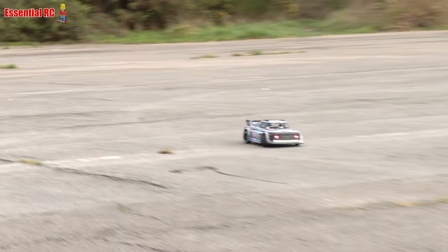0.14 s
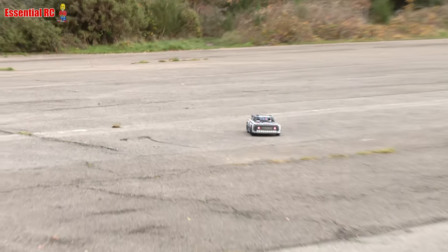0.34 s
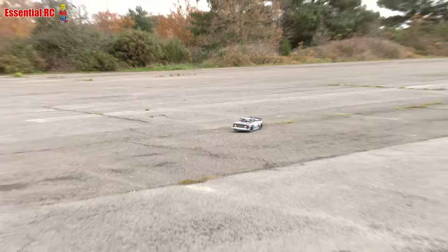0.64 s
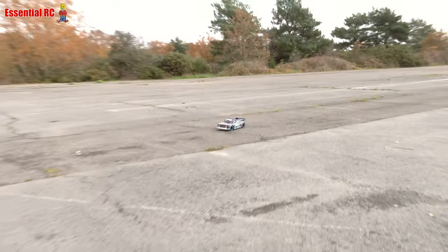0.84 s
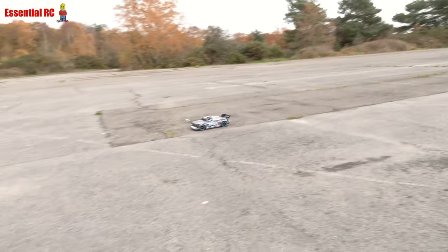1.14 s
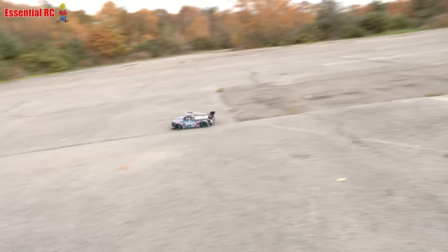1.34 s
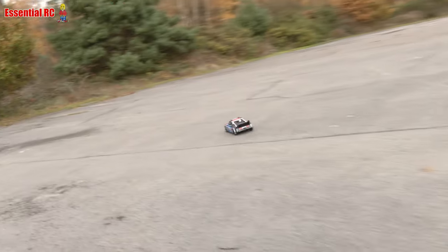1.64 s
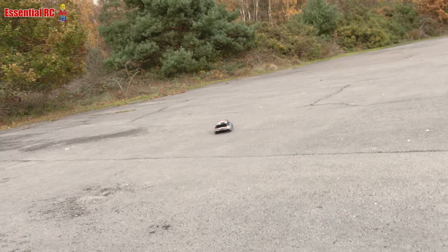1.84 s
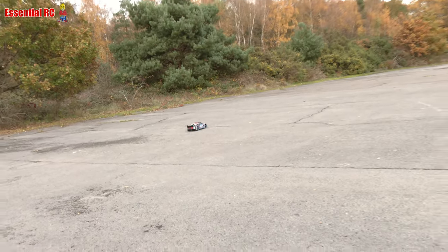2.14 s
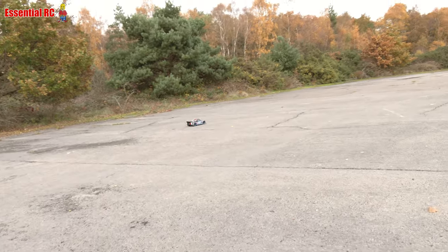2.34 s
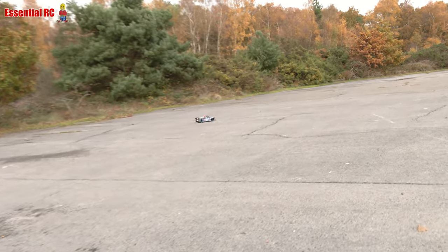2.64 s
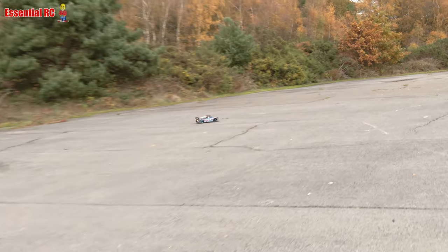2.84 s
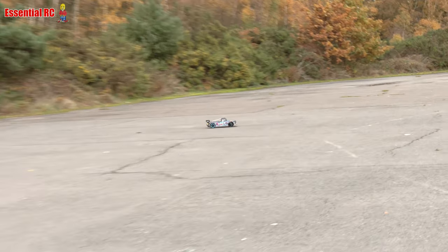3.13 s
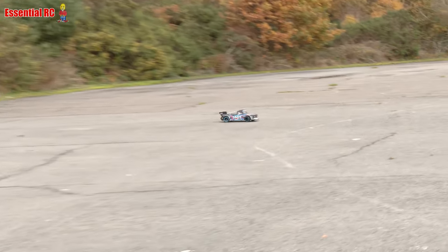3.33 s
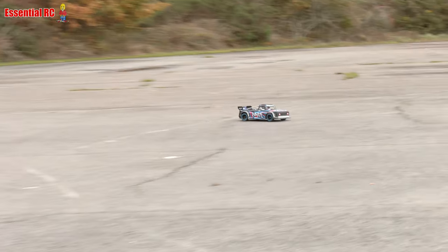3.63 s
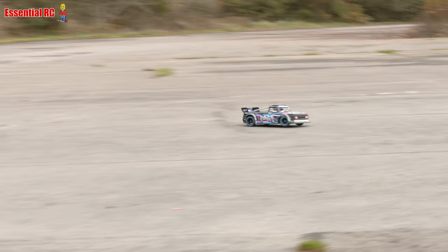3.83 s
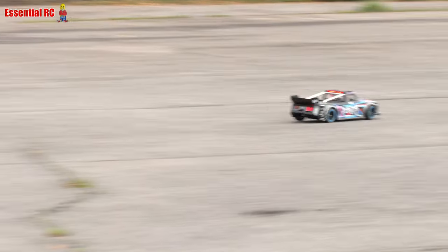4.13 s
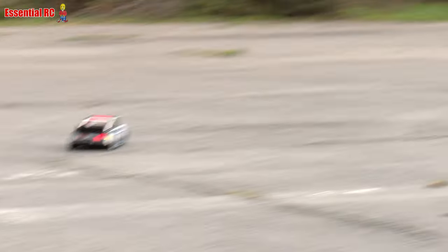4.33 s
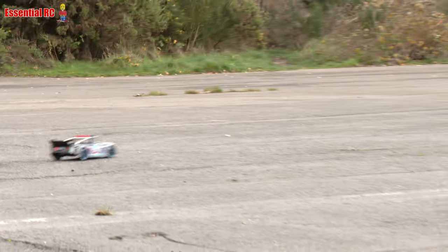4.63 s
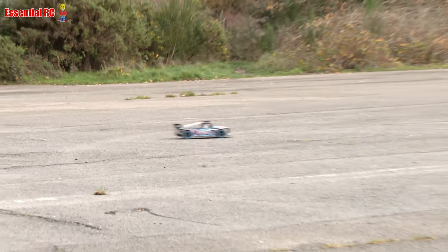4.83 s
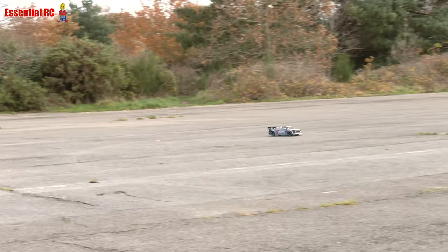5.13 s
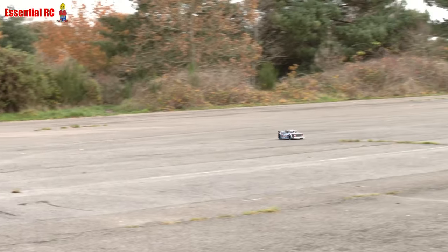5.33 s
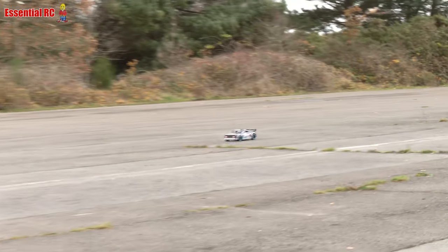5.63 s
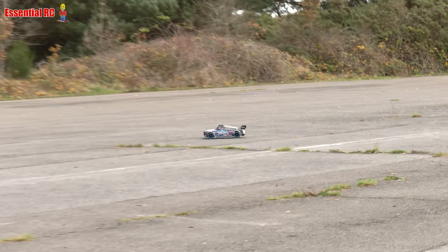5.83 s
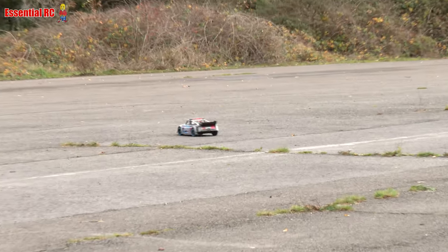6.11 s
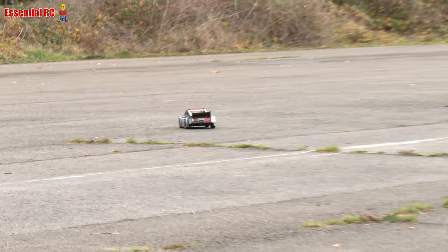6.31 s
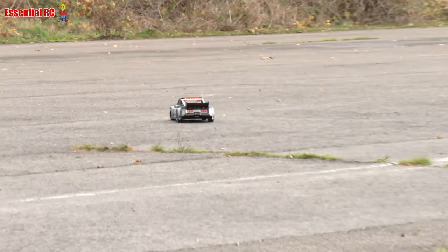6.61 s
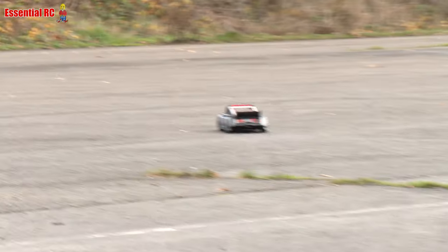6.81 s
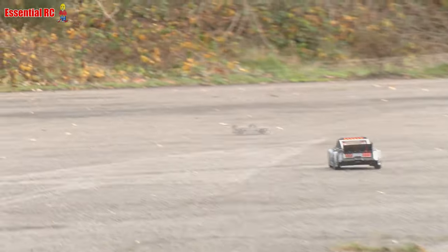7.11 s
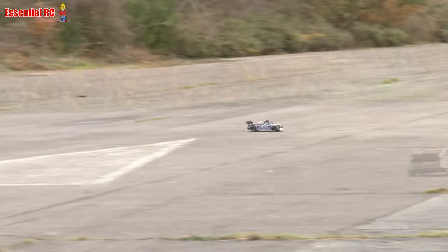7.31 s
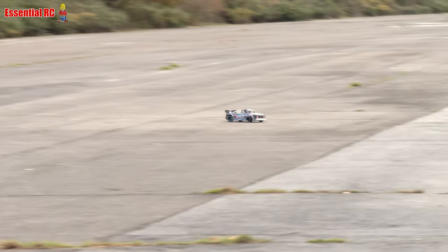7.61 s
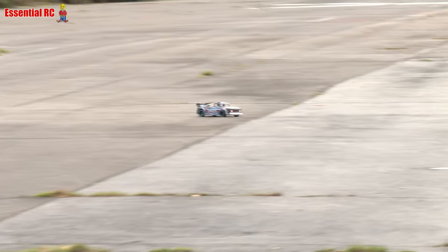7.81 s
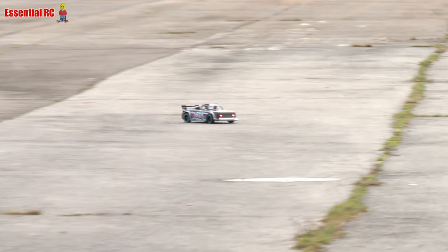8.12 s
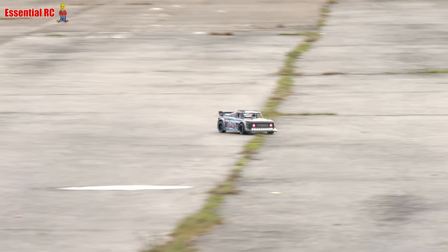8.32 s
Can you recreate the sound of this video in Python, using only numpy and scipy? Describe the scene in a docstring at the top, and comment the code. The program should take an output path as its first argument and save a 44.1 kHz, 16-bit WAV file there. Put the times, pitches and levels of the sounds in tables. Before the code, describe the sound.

Outdoors on open asphalt, a small electric truck gives a gritty, high gear whine with scraping rasp. Its pitch plunges in turns and climbs again under throttle. Tyres rumble on a hollow plastic shell, with rattles, sharp clicks and tiny squeals. It is loudest early on, drops sharply near the middle, and ends quieter and farther away. Close stereo microphone, light wind puffs, faint hush and very little echo.

```python
"""Radio-controlled truck on asphalt

A small electric truck laps an open car park close to two microphone ports.
Meshing gear teeth give harmonics and scraping noise; tyres are random impacts on a resonant plastic shell.
Short broadband clicks, each with a dull ring, and brief squeals stand out above them.
Low noise is wind at the ports, steady wider noise is distant outdoor hush, and a decaying scatter is the faint echo."""
import sys
import numpy as np
from scipy import signal
from scipy.fft import rfft, irfft, next_fast_len
from scipy.io import wavfile

SR = 44100
rng = np.random.default_rng(int(sys.argv[2]) if len(sys.argv) > 2 else 0)


def bounce(signal):
    """Save signal as a 16-bit WAV file at the path given by the first command-line argument."""
    frames = np.transpose(np.atleast_2d(signal))
    limited = np.clip(frames, -1, 1)
    pcm = np.round(limited * 32767).astype(np.int16)
    wavfile.write(sys.argv[1], SR, pcm)


N = 373086
TIME = np.arange(N) / SR  # s
SIZE = next_fast_len(N + SR // 2)  # transform length, with room for the echo
HZ = np.maximum(np.arange(SIZE // 2 + 1) * SR / SIZE, 1)

# motor speed, as the rate at which gear teeth mesh: [t/s, f/Hz]
MESH_RATE = [(0, 2240), (.1, 2183), (.135, 1755), (.2, 1364), (.3, 1033), (.41, 1464), (.51, 1925),
             (.63, 2025), (.72, 2150), (.78, 2468), (.83, 2245), (.96, 2345), (1.08, 2320), (1.16, 2220),
             (1.23, 2310), (1.42, 2283), (1.48, 2212), (1.52, 2362), (1.555, 2165), (1.62, 2373),
             (1.76, 2177), (1.8, 1830), (1.85, 1640), (1.96, 1450), (2.08, 1002), (2.22, 1261), (2.3, 1676),
             (2.54, 1990), (2.65, 2254), (2.72, 2183), (2.82, 2208), (2.87, 1770), (2.96, 1751),
             (3.05, 1834), (3.11, 1778), (3.22, 2129), (3.33, 2141), (3.45, 2297), (3.56, 2150),
             (3.66, 2255), (3.88, 2254), (3.93, 2132), (4, 2250), (4.035, 1995), (4.16, 2050), (4.25, 2278),
             (4.31, 2160), (4.39, 2330), (4.48, 2257), (4.53, 2317), (4.59, 2046), (4.64, 2139),
             (4.67, 1780), (4.71, 1473), (4.84, 1548), (4.92, 1772), (5.05, 1960), (5.13, 1906),
             (5.21, 2153), (5.4, 2223), (5.54, 2227), (5.6, 2043), (5.73, 880), (5.8, 1108), (5.87, 1480),
             (5.96, 1517), (6.02, 1390), (6.07, 1602), (6.19, 1638), (6.255, 1755), (6.32, 1236),
             (6.38, 1023), (6.42, 1275), (6.465, 1263), (6.515, 1620), (6.56, 1523), (6.61, 1048),
             (6.68, 992), (6.76, 1469), (6.85, 1655), (6.96, 1627), (7.03, 1795), (7.065, 2060),
             (7.135, 1752), (7.21, 1937), (7.27, 1900), (7.42, 1606), (7.7, 1504), (7.99, 1492),
             (8.1, 1696), (8.15, 1924), (8.19, 1870), (8.24, 1984), (8.285, 1900), (8.35, 2255),
             (8.46, 2410)]
# spans in which the gears run slack; a row that ends before it starts has no effect: [start t/s, end t/s]
SLACK_SPANS = [(.115, 0.39), (1.797, 2.25), (2.82, 2.74), (4.03, 4.37), (4.69, 4.74), (5.63, 6),
               (5.97, 6.14), (6.26, 6.41), (6.565, 6.87), (7.06, 7.06), (7.24, 7.5)]
# how strongly the gears sing over their rasp: [t/s, relative level/dB]
SINGING = [(0, -4), (.25, -10), (.42, -5), (.55, -1.5), (.8, -4), (1.1, -2), (1.4, -1.5), (1.75, -7),
           (2.25, -12), (2.42, -6), (2.7, -3.5), (2.9, -6), (3.1, -6), (3.45, -3), (3.6, -5), (3.9, -3.5),
           (4.6, -6), (4.85, -8), (5.15, -6.5), (5.55, -1.5), (5.75, -6), (5.9, -4), (6.3, -2), (6.55, -1),
           (6.9, -1.5), (7.25, -2), (7.5, -8), (7.95, -11), (8.2, -2), (8.46, -3)]
# harmonics of the gear whine: [multiple of the mesh rate, relative level/dB]
WHINE_HARMONICS = [(1, -0.5), (2, -2.5), (3, -3), (4, -2.5), (5, -1.5), (6, -2)]
# how well the gearbox radiates its whine: [f/Hz, gain/dB]
GEARBOX_GAIN = [(700, 22), (1300, -2.5), (1850, 3.5), (2300, -3), (2650, 9), (3100, 7), (3900, 6),
                (4600, 3.5), (5600, -0.5), (6400, -3.5), (7600, 5), (8500, -0.5), (9200, -10), (10200, -30),
                (15000, -31)]
# spectrum of scraping teeth, also of the clicks: [f/Hz, relative density/dB]
RASP_SPECTRUM = [(100, -32), (1500, -10.5), (2600, -0.5), (3300, -1.5), (4500, -0.5), (5500, -1), (7300, 2),
                 (8900, -5), (10000, -17.5), (13000, -23.5), (15500, -38)]
# spectrum of slack teeth clattering: [f/Hz, relative density/dB]
CLATTER_SPECTRUM = [(800, -25), (2000, -15), (2600, -5), (3800, 14), (5000, -6), (7000, -20), (12000, -42)]
# gears as the truck nears, turns and leaves, and falling almost silent briefly near 7.4 s, before speed and
# load: [t/s, level/dB]
GEAR_LEVEL = [(0, -30), (.3, -31), (.55, -28), (.66, -29.5), (.8, -26), (1.15, -25), (1.35, -23),
              (1.5, -24.5), (1.77, -24), (1.9, -27.5), (2.1, -27.5), (2.35, -27), (3, -32.5), (3.35, -29),
              (3.6, -29.5), (4.15, -28.5), (4.45, -27.5), (4.68, -29.5), (4.72, -45), (4.79, -35),
              (4.95, -32.5), (5.55, -33), (6.2, -32), (6.5, -36.5), (6.8, -34), (7.1, -35.5), (7.4, -50.5),
              (7.7, -46), (8, -44.5), (8.46, -41.5)]
# depth of the throb of the big gear, either side of its mean: [t/s, depth/dB]
THROB_DEPTH = [(0, 2), (1.3, 1.5), (1.7, 3), (1.9, 4.5), (2.1, 2.5), (2.6, 1.5), (7, 1.5), (7.4, 2.5),
               (8.46, 1.5)]
# spectrum of the chassis rattle: [f/Hz, relative density/dB]
RATTLE_SPECTRUM = [(100, -34), (600, -25), (1100, 3.5), (1400, 2.5), (1800, 6), (2200, -2), (2900, -21),
                   (5000, -36)]
# chassis rattle, before the bumps: [t/s, level/dB]
RATTLE_LEVEL = [(0, -35), (.26, -38), (.54, -31), (.85, -32), (1.75, -27), (2.05, -36), (2.4, -35),
                (3.3, -37.5), (3.72, -39), (4.5, -31.5), (4.8, -44.5), (4.97, -39.5), (5.4, -39),
                (5.95, -46), (6.24, -39.5), (6.65, -43.5), (7.05, -41), (7.55, -52.5), (8.46, -48.5)]
# spectrum of the tyres before the shell resonates: [f/Hz, relative density/dB]
TYRE_SPECTRUM = [(30, -56), (100, -23), (280, -8.5), (400, -5.5), (520, -3), (750, -1), (1100, -11),
                 (1600, -12), (4000, -40)]
# plastic shell resonances, added to the direct sound: [f/Hz, width/Hz, level/dB]
SHELL_MODES = [(599, 140, 7), (666, 46, -6.5)]
# rolling wheels, before their random drift: [t/s, level/dB]
ROLLING_LEVEL = [(0, -37.5), (.35, -38.5), (1, -31), (1.45, -29), (1.8, -32.5), (2.1, -37), (2.6, -38),
                 (3.75, -39), (4.4, -35), (4.8, -39.5), (5.6, -43), (6.05, -50.5), (7, -43), (7.4, -47),
                 (7.851, -50), (8.46, -43)]
# sideways slides through the turns: [t/s, length/s, level/dB]
SLIDES = [(1.4, 0.56, -32.5), (2.85, 0.99, -36.5), (3.95, 0.84, -44), (5.2, 0.27, -45), (5.95, 0.56, -45.5)]
# top treble of the truck: [t/s, gain/dB]
TREBLE_GAIN = [(0, 0.5), (1.2, 6), (2, 0), (3.8, 3.5), (4.3, -1), (5.7, -1.5), (6.8, -1), (7.5, -5),
               (8.46, 3)]
# balance of the microphone ports: [f/Hz, left minus right level/dB]
PORT_BALANCE = [(150, -4.5), (380, 3), (700, 6), (1400, 6.5), (2300, 8), (3100, 2.5), (4500, 2.5),
                (6000, -5.5), (8000, -4), (10000, 1)]
# phase between the ports: [f/Hz, lead of the left/rad]
PORT_PHASE = [(0, 0), (260, -2.2), (1400, -2.6), (3000, -3.25), (5300, -4.2), (8000, -4.6), (9800, -6),
              (15000, -9.4)]
# spectrum of the outdoor hush: [f/Hz, relative density/dB]
HUSH_SPECTRUM = [(40, -25), (120, -1.5), (300, -6.5), (450, -9), (610, 0), (800, -5), (1200, -10.5),
                 (2500, -16), (7000, -25), (10000, -29), (15000, -32)]
# spectrum of the wind on the ports: [f/Hz, relative density/dB]
WIND_SPECTRUM = [(20, -27), (50, -2), (90, 0), (150, -2), (250, -6.5), (500, -23.5), (1500, -57)]
# gusts and puffs, before lumps and port balance: [t/s, length/s, level/dB]
GUSTS = [(.08, 0.33, -41), (.6, 0.4, -48.5), (1.75, 0.16, -57), (3.75, 0.41, -64), (4.5, 0.46, -45.5),
         (5.823, 0.056, -45), (2.6, 0.97, -61), (5.2, 0.24, -58), (6.1, 0.5, -53.5), (6.207, 0.023, -49),
         (6.97, 0.19, -52)]
# short broadband clicks, each with a dull ring, before the gains of both: [t/s, level/dB]
CLICKS = [(0.017, -25.5), (0.157, -48), (0.299, -33), (0.681, -34), (1.382, -24), (2.149, -33),
          (2.751, -34), (4.727, -25), (4.975, -24)]
# short squeals as the gear whine passes a body resonance: [t/s, length/s, f/Hz, level/dB]
SQUEALS = [(2.153, 0.052, 685, -34), (2.787, 0.092, 931, -29.5), (4.735, 0.016, 1494, -34),
           (5.811, 0.029, 1141, -37), (6.381, 0.023, 968, -27.5), (6.657, 0.043, 1004, -36),
           (7.019, 0.086, 1757, -34), (7.138, 0.098, 1760, -33.5)]
# growls of the drive train pulling out of a turn: [t/s, length/s, level/dB]
GROWLS = [(2.3, .4, -45), (3.1, .7, -43.5), (4.97, .22, -42), (7.15, .5, -46)]
# the hardest puff, before port balance: [t/s, length/s, f/Hz, peak level/dB]
THUMPS = [(4.727, .015, 125, -29)]

TEETH = 31  # tooth contacts per turn of the big gear
PINION_TEETH = 9.5  # tooth contacts per cycle of the pinion's wobble
TORQUE_LAG_S = 0.0033  # time constant with which the gears take up load and go slack
FULL_HZ = 2200  # mesh rate at which the gear levels hold
GEAR_DB_PER_OCTAVE, SLACK_DROP_DB = 5.5, 2.5  # rise with speed, drop when slack
RASP_DB, WHINE_DB, CLATTER_DB = -0.32, -3.3, -10  # relative levels within the gears
SLACK_WHINE_DROP_DB = 4  # further loss of whine when the teeth run slack
TOOTH_REPEAT = 0.11  # share of a tooth's scrape that the next repeats, at FULL_HZ and full load
SCRUB_DB = -10.5  # tread hum on the straight, against the rolling level
CALM_DB = -61  # breeze between gusts, before lumps and port balance
WIND_LEFT_DB = -17.0  # wind on the left port, against the right
TREBLE_FROM_HZ, CUTOFF_HZ = 9500, 15600


def from_db(db):
    """Decibel law: amplitude gain from a level."""
    return 10 ** (np.asarray(db) / 20)


def rms_one(x):
    """Normalisation: scale to unit root-mean-square amplitude."""
    return x / np.sqrt(np.mean(x ** 2) + 1e-20)


def curve(rows):
    """Linear interpolation: a (time, value) table at every sample."""
    times, values = np.transpose(rows)
    return np.interp(TIME, times, values)


def response(points):
    """Frequency response: gain from (Hz, dB) points, interpolated over log frequency."""
    hz, db = np.transpose(points)
    return from_db(np.interp(np.log(HZ), np.log(hz), db))


def filtered(x, gain):
    """Linear filtering: multiply the spectrum by a frequency response."""
    return irfft(rfft(x, SIZE) * gain, SIZE)[..., :N]


def shaped_noise(gain, channels=()):
    """Spectral shaping: white noise through a frequency response."""
    return filtered(rng.standard_normal((*channels, N)), gain)


def drift(rate):
    """Low-passed random process: smooth motion of unit rms, changing about rate times a second."""
    r = np.exp(-20 * np.pi * rate / SR)  # computed at a tenth of the sample rate
    noise = rng.standard_normal(N // 10 + 4002)
    slow = signal.lfilter([1], [1, -2 * r, r * r], noise)[4000:]  # start-up dropped
    return np.interp(np.arange(N) / 10, np.arange(len(slow)), rms_one(slow))


def grains(per_s, spread_db):
    """Random impulse train: tiny impacts of uneven size."""
    sizes = from_db(spread_db * np.minimum(rng.exponential(1, N), 5))
    struck = rng.random(N) < per_s / SR
    return rms_one(sizes * rng.standard_normal(N) * struck)


def swell(s, length):
    """Gaussian envelope: a smooth bump around time s."""
    return np.exp(-(2 * (TIME - s) / length) ** 2)


def swells(rows):
    """Superposition: summed smooth bumps from (s, length s, dB) rows."""
    return sum(from_db(db) * swell(s, length) for s, length, db in rows)


def resonance(hz, width_hz):
    """Forced resonance: dense rubbing sets a narrow, rough mode humming."""
    mode = 1 / (1 + 2j * (HZ - hz) / width_hz) ** 2
    return rms_one(filtered(grains(per_s=3000, spread_db=-1.0), mode))


def lagged(x, lag_s):
    """First-order lag: follow a control exponentially."""
    r = np.exp(-1 / (lag_s * SR))
    return x[0] + signal.lfilter([1 - r], [1, -r], x - x[0])


def motor():
    """Torque lag: mesh rate (Hz), and torque (0-1) that falls quickly in each slack span."""
    loaded = np.ones(N)
    for start, end in SLACK_SPANS:
        loaded[(TIME >= start) & (TIME < end)] = 0
    return curve(MESH_RATE), lagged(loaded, TORQUE_LAG_S)


def whine(contacts, flutter_db, smear, smear_hz, sideband):
    """Harmonic tooth meshing: backlash smears upper harmonics most; an off-centre pinion adds sidebands."""
    out = np.zeros(N)
    pinion = np.cos(2 * np.pi * contacts / PINION_TEETH)
    for k, db in WHINE_HARMONICS:
        angle = 2 * np.pi * k * contacts
        in_phase = drift(smear_hz * k) * np.cos(angle)
        quadrature = drift(smear_hz * k) * np.sin(angle)
        tone = np.cos(angle) + smear * (k + 1) * (in_phase + quadrature)
        level = from_db(db + flutter_db * np.tanh(drift(40)))
        out += level * rms_one(tone * (1 + sideband * pinion))
    return filtered(out, response(GEARBOX_GAIN))


def rasp(contacts, mesh_hz, repeat, bite):
    """Modulated, comb-filtered noise: scrapes peak at each contact and partly repeat at the next.

    The repetition makes broad spectral humps that follow the speed.
    """
    scrape = (1 + bite * np.cos(2 * np.pi * contacts)) * rng.standard_normal(N)
    last_tooth = np.interp(TIME - 1 / mesh_hz, TIME, scrape)
    repeated = (scrape + repeat * last_tooth) / np.hypot(1, repeat)
    return rms_one(filtered(repeated, response(RASP_SPECTRUM)))


def gears(bumps_db):
    """Load and speed dependence: whine, rasp and slack clatter share one rate and one torque."""
    mesh_hz, torque = motor()
    slack = 1 - torque
    # the wheels grip and slip, so the motor speed never holds still
    contacts = np.cumsum(mesh_hz * (1 + .007 * drift(30) + .007 * drift(110))) / SR
    singing = whine(contacts, flutter_db=5, smear=.23, smear_hz=65, sideband=.35)
    repeat = TOOTH_REPEAT * torque * mesh_hz / FULL_HZ
    mix = from_db(WHINE_DB + curve(SINGING) - SLACK_WHINE_DROP_DB * slack) * singing
    mix += from_db(RASP_DB) * rasp(contacts, mesh_hz, repeat, bite=0.34)
    mix += from_db(CLATTER_DB) * slack * slack_clatter()
    # the load throbs once per turn of the big gear
    throb_db = curve(THROB_DEPTH) * np.cos(2 * np.pi * contacts / TEETH)
    speed_db = GEAR_DB_PER_OCTAVE * np.log2(mesh_hz / FULL_HZ)
    return mix * from_db(throb_db + curve(GEAR_LEVEL) + speed_db - SLACK_DROP_DB * slack + bumps_db)


def chassis_rattle(bumps_db):
    """Impact noise: dense small impacts, coloured by the chassis and swayed by the bumps."""
    rattle = filtered(grains(per_s=5000, spread_db=0.5), response(RATTLE_SPECTRUM))
    return rms_one(rattle) * from_db(curve(RATTLE_LEVEL) + bumps_db)


def tyres():
    """Modal excitation: rough asphalt drums through the tyres and rings the shell."""
    body = 1 + sum(from_db(db) / (1 + 2j * (HZ - hz) / width) for hz, width, db in SHELL_MODES)
    return rms_one(filtered(grains(per_s=2400, spread_db=2.5), response(TYRE_SPECTRUM) * body))


def tread_hum():
    """Frictional resonance: the tread hums as it rolls, and more as it slides sideways."""
    return resonance(hz=954.9, width_hz=154) * (from_db(curve(ROLLING_LEVEL) + SCRUB_DB) + swells(SLIDES))


def shaded(x):
    """Time-varying treble gain: the top brightens and dulls as the truck goes round."""
    top = filtered(x, 1 / (1 + (TREBLE_FROM_HZ / HZ) ** 16))
    return x + (from_db(curve(TREBLE_GAIN)) - 1) * top


def ports(x, sway):
    """Level and phase differences: each port has its own colour; the right's delay sways, in samples."""
    lead = np.interp(HZ, *np.transpose(PORT_PHASE))
    ratio = response(PORT_BALANCE)
    right = np.sqrt(2 / (1 + ratio ** 2))  # keeps the summed power of the ports
    left_wave = filtered(x, right * ratio * np.exp(1j * lead))
    right_wave = filtered(x, right)
    slope = filtered(x, right * 2j * np.pi * HZ / SR)
    # a small delay subtracts the slope of the wave
    return np.array([left_wave, right_wave - sway * drift(8.3) * slope])


def surroundings(x, t60, dull_hz):
    """Diffuse reflection: a short scatter from the ground and things nearby, independent on each side."""
    t = TIME[:SR // 2]
    tail = rng.standard_normal((2, len(t))) * from_db(-60 * t / t60)
    tail /= np.sqrt(np.sum(tail ** 2) / 2)
    return filtered(x, rfft(tail, SIZE) / np.hypot(1, HZ / dull_hz))


def hush():
    """Stationary noise: the distant outdoor hush, independent on each side."""
    return from_db(-52.5) * rms_one(shaped_noise(response(HUSH_SPECTRUM), (2,)))


def breeze(lumps_db):
    """Wind turbulence: lumpy low noise, separate at each port and stronger on the right."""
    gain = (from_db(CALM_DB) + swells(GUSTS)) * from_db(lumps_db * drift(4.7))
    sides = from_db([[WIND_LEFT_DB], [0]])
    noise = rms_one(shaped_noise(response(WIND_SPECTRUM), (2,)) * sides)
    return gain * noise + thumps() * sides


def decaying(onsets, t60):
    """Exponential decay: each onset falls by 60 dB in t60 seconds."""
    return signal.lfilter([1], [1, -from_db(-60 / (t60 * SR))], onsets + 1e-18)


def clicks(t60, click_db, ring_db):
    """Decaying noise bursts: each short broadband click comes with a longer, dull ring."""
    onsets = np.zeros(N)
    for s, db in CLICKS:
        onsets[int(s * SR)] = from_db(db)
    click = decaying(onsets, 0.0045) * rms_one(shaped_noise(response(RASP_SPECTRUM)))
    ring = decaying(onsets, t60) * tyres()  # coloured like the tyre noise
    return from_db(click_db) * click + from_db(ring_db) * ring


def slack_clatter():
    """Backlash noise: slack teeth clatter as a steady hiss."""
    return rms_one(shaped_noise(response(CLATTER_SPECTRUM)))


def squeals(waver):
    """Resonant tones: short, slightly unsteady squeals as the gear whine passes a body resonance."""
    clock = np.cumsum(1 + waver * drift(67.3)) / SR
    out = np.zeros(N)
    for s, length, hz, db in SQUEALS:
        out += from_db(db) * swell(s, length) * np.sqrt(2) * np.sin(2 * np.pi * hz * clock)
    return out


def growl():
    """Fixed resonance: the drive train growls at one pitch when it pulls out of a turn."""
    return resonance(hz=1780, width_hz=350) * swells(GROWLS)


def thumps():
    """Pressure pulse: the hardest puff is a couple of low cycles."""
    out = np.zeros(N)
    for s, length, hz, db in THUMPS:
        out += from_db(db) * swell(s, length) * np.sin(2 * np.pi * hz * (TIME - s))
    return out


def truck():
    """Superposition: all sources of the truck, with gears and chassis shaken by the same bumps."""
    bumps_db = .8 * drift(75)
    roar = tyres() * from_db(curve(ROLLING_LEVEL) + 1.3 * drift(22))
    rolling = gears(bumps_db) + chassis_rattle(bumps_db) + roar + tread_hum()
    clicking = clicks(t60=0.034, click_db=2, ring_db=-1.0)
    return rolling + clicking + squeals(waver=0.0119) + growl()


def scene():
    """Direct and reflected sound: the truck, its echo, the breeze and the hush."""
    source = shaded(truck())
    echo = from_db(-13) * surroundings(source, t60=.3, dull_hz=14000)
    return ports(source, sway=0.34) + echo + breeze(lumps_db=3.0) + hush()


def record(dry):
    """Band limitation: an elliptic low-pass cuts the top steeply."""
    lowpass = signal.ellip(12, .1, 90, CUTOFF_HZ, fs=SR, output="sos")
    return signal.sosfilt(lowpass, dry)


dry = scene()
out = record(dry)
bounce(out)
```